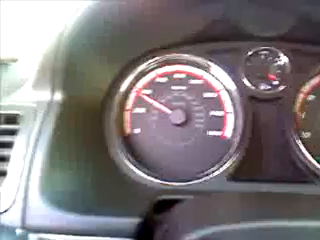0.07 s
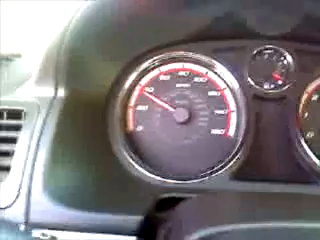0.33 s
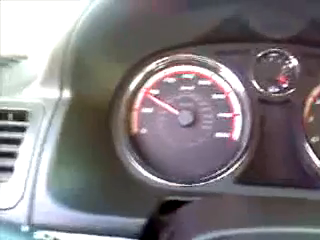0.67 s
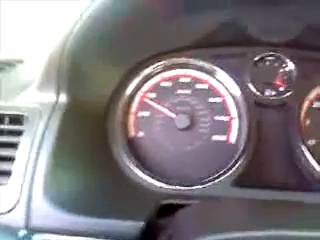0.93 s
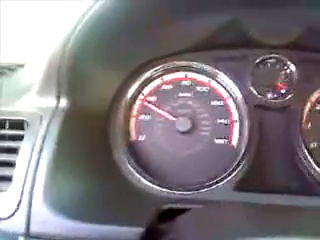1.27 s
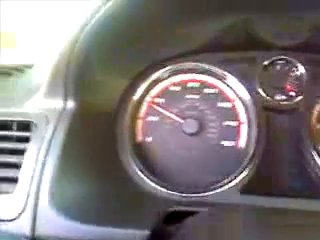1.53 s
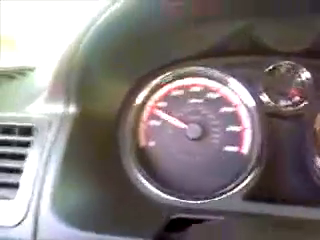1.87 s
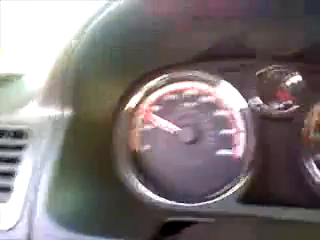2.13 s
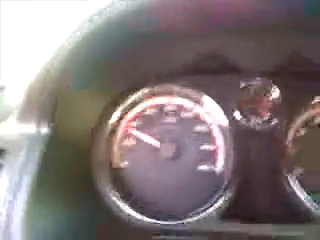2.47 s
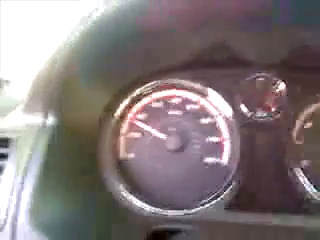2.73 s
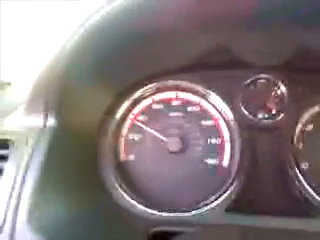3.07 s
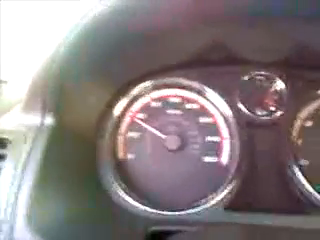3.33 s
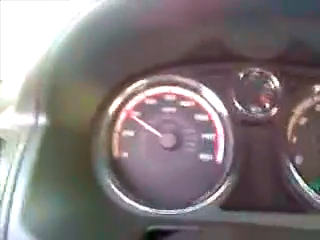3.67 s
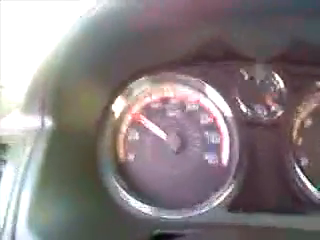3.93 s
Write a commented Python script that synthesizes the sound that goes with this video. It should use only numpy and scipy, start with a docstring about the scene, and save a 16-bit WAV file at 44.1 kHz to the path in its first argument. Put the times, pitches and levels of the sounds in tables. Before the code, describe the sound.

A car's supercharger whine climbs steadily over a growing engine roar after a short stretch of soft road noise. The dashboard trim ticks and rattles a few times, all sounding thin through a small microphone in the cabin.

```python
"""Inside a supercharged four-cylinder car, heard through a small microphone with almost no bass.
It opens abruptly on two seconds of cruising: tyre noise, a hiss that comes and goes, ticks of trim.
Then the throttle opens, the intake roars and the blower's whine climbs with the revs, its partials
swelling and fading as they sweep through the cabin's resonances. On the way up the engine booms
and small bumps rattle the trim."""
import sys
import numpy as np
from scipy import signal
from scipy.fft import rfft, irfft
from scipy.io import wavfile

SR = 44100
rng = np.random.default_rng(int(sys.argv[2]) if len(sys.argv) > 2 else 0)


def store_pcm(level_fs):
    """Save levels as 16-bit WAV."""
    pcm = np.round(np.clip(level_fs, -1, 1) * 32767).astype(np.int16)
    wavfile.write(sys.argv[1], SR, np.atleast_2d(pcm).T)


N = 176400
T = np.arange(N) / SR


def from_db(db):
    """Decibels to gain."""
    return 10 ** (np.asarray(db) / 20)


def rms_one(x):
    """Scale to unit rms."""
    return x / np.sqrt(np.mean(x ** 2) + 1e-20)


def in_time(rows):
    """An automation curve, read at every sample."""
    return np.interp(T, *np.transpose(rows))


def at_hz(points, hz):
    """An EQ curve in dB, read on a log-frequency axis."""
    known, db = np.transpose(points)
    return np.interp(np.log(np.maximum(hz, 1)), np.log(known), db)


def drift(rate_hz):
    """A smooth random modulator, rms about 1."""
    hop, settle = 40, 2000
    pole = np.exp(-2 * np.pi * hop * rate_hz / SR)
    white = rng.standard_normal(N // hop + settle + 2)
    slow = signal.lfilter([1], [1, -2 * pole, pole * pole], white)[settle:]
    return np.interp(np.arange(N) / hop, np.arange(len(slow)), rms_one(slow))


def resonate(x, hz, width_hz):
    """A resonance with gain 1 at its peak."""
    r = np.exp(-np.pi * width_hz / SR)
    feedback = [1, -2 * r * np.cos(2 * np.pi * hz / SR), r * r]
    return signal.lfilter(np.array([1, 0, -1]) * (1 - r * r) / 2, feedback, x)


def cabin_noise(spectrum, bands=14):
    """Coloured noise with fine peaks and dips from the cabin's dense modes; its bands flicker; rms 1."""
    ripple_db, ripple_width_hz, flicker_db = 1.95, 59, 1.0
    hz = np.arange(N // 2 + 1) * SR / N
    peaks = rng.standard_normal(1000)
    ripple = np.interp(hz / ripple_width_hz, np.arange(len(peaks)), peaks) * np.clip(hz / 2500, 0, 1)
    coloured = rfft(rng.standard_normal(N)) * from_db(at_hz(spectrum, hz) + ripple_db * ripple)
    band_of_bin = np.searchsorted(np.geomspace(400, 9000, bands - 1), hz)
    layers = (irfft(coloured * (band_of_bin == k), N) for k in range(bands))
    return rms_one(sum(layer * from_db(flicker_db * drift(rate_hz=23)) for layer in layers))


def partial(phase, depth, rate_hz):
    """A sine that starts anywhere in its cycle and wavers in level and phase; rms 1."""
    waver = 1 + depth * (drift(rate_hz) + 1j * drift(rate_hz))
    tone = np.exp(1j * (phase + 2 * np.pi * rng.random()))
    return rms_one((waver * tone).real)


def road():
    """The bed: steady tyre noise and a faint cabin hum under an airy hiss that comes and goes."""
    # colours of tyre noise and hiss (frequency [Hz], relative level [dB])
    tyre_colour = [(30, -75), (150, -84), (230, -33), (300, -29), (345, -48.5), (400, -17), (500, -17.5),
                   (610, 0.5), (800, -4), (930, 4), (1300, 4.5), (1520, -2), (1800, -1.5), (2450, -4),
                   (3150, -11), (3600, -13.5), (6000, -36.5), (11000, -31)]
    hiss_colour = [(150, -58), (500, -21), (2000, -16.5), (4000, 2.5), (5800, 0.5), (7000, 5), (9000, 3.5),
                   (11000, 0.5)]
    # swells of the hiss (time [s], level [dB])
    hiss_level = [(0, -56), (.25, -57), (.45, -64.5), (.6, -74.5), (1.1, -71), (1.3, -66.5), (1.44, -61.5),
                  (1.55, -65.5), (1.85, -70), (4, -60.5)]
    hum_hz = 314
    hum = from_db(-99) * partial(2 * np.pi * hum_hz * T, depth=0.27, rate_hz=11)
    tyres = from_db(-59) * cabin_noise(tyre_colour)
    hiss = from_db(in_time(hiss_level)) * cabin_noise(hiss_colour)
    return tyres + hiss + hum


def trim_rattle():
    """Each bump sets off a click or a short dying rattle of the trim, with one loose part ringing along."""
    # bumps (time [s], rattle level [dB], time to fall 20 dB [s], ring [Hz], ring over rattle [dB])
    bumps = [(0.6253, -56.5, 0.0075, 7200, 2), (0.634, -66, .06, 5960, -5), (0.704, -61.5, 0.012, 5150, 6),
             (0.706, -64, 0.014, 6600, 3), (1.604, -61, 0.035, 9500, -6), (2.759, -46.5, 0.078, 5230, -6),
             (2.791, -54.5, 0.022, 10000, 4.5), (3.403, -55, 0.1, 7200, 0)]
    # the trim's resonances (frequency [Hz], width [Hz], relative level [dB])
    trim_modes = [(3230, 410, 7), (5150, 530, 10.5), (6700, 7800, -4), (7200, 180, 8.5), (9230, 810, 1.5)]
    chatter = rng.standard_normal(N)
    rattle = rms_one(sum(from_db(db) * resonate(chatter, hz, width) for hz, width, db in trim_modes))
    out = 0
    for start, db, decay_s, ring_hz, ring_db in bumps:
        ring = from_db(ring_db) * rms_one(resonate(rng.standard_normal(N), ring_hz, width_hz=320))
        envelope = (T >= start) * from_db(db - 20 * np.maximum(T - start, 0) / decay_s)
        out += envelope * (rattle + ring)
    low_cut = signal.butter(2, 1800, "high", fs=SR, output="sos")  # the clicks and rattles carry no bass
    return signal.sosfilt(low_cut, out)


def engine(cycle_hz, cycle_phase):
    """Orders of the four-stroke cycle; every fourth is a firing order and stands out, and two boom."""
    # swell of the engine note (time [s], gain [dB])
    swell = [(0, -33), (1.6, -30), (1.9, -18.5), (2.07, -15.5), (2.5, -6), (3.2, -6), (4, 0.5)]
    # its colour in the cabin (frequency [Hz], gain [dB])
    colour = [(110, -55), (240, -38), (315, -28), (430, -26), (530, -11.5), (620, 2.5), (720, -10.5),
              (820, -6), (950, -2), (1100, -3), (1500, -7.5), (2500, -19)]
    # the two firing orders that boom in the cabin as the revs rise (time [s], level [dB])
    boom_20 = [(1.8, -100), (2.07, -70), (2.35, -67), (2.66, -68), (2.72, -53.5), (3.05, -61), (3.4, -52),
               (3.65, -63), (3.73, -45.5), (3.82, -73)]
    boom_24 = [(1.8, -89), (2.1, -61.5), (2.35, -58), (2.58, -49), (2.72, -59.5), (3.2, -72), (3.68, -60),
               (3.75, -64), (3.81, -66)]
    booms = {20: boom_20, 24: boom_24}
    firing_trim_db, between_trim_db = -55, -66.5
    out = 0
    for order in range(4, 49):
        phase = order * cycle_phase
        if order in booms:
            out += from_db(in_time(booms[order])) * partial(phase, depth=0.2, rate_hz=2.4)
        else:
            trim_db = firing_trim_db if order % 4 == 0 else between_trim_db
            db = in_time(swell) + trim_db + at_hz(colour, order * cycle_hz)
            out += from_db(db) * partial(phase, depth=0.4, rate_hz=6.6)
    return out


def intake(cycle_phase, load_db):
    """Rushing air that grows with the load and throbs with each cylinder's stroke."""
    # colour of the roar (frequency [Hz], relative level [dB])
    roar_colour = [(30, -54), (180, -75), (340, -44), (420, -14), (510, -7), (610, 0), (740, 9), (860, 0.5),
                   (960, 4.5), (1120, -9.5), (1320, 7), (1500, -1), (1750, 4.5), (2100, 0.5), (3050, 2),
                   (3600, -5), (4700, -2.5), (7000, -6.5), (9000, -9.5), (11000, -18.5)]
    throb = 1 + 0.034 * np.cos(4 * cycle_phase)
    return from_db(-43.5 + load_db) * throb * cabin_noise(roar_colour)


def supercharger(lobe_phase, load_db):
    """The whine, harmonics of the lobe rate: three lead, weaker ones drift in and out and flare."""
    # the leading harmonics, 2, 4 and 6 (time [s], level [dB])
    second = [(2.0, -82), (2.601, -54.5), (2.82, -41), (2.96, -44.5), (3.04, -53.5), (3.18, -61),
              (3.378, -46), (3.44, -58.5), (3.618, -66), (3.628, -51.5), (3.7, -43.5), (3.785, -37.5),
              (3.93, -44.5), (4, -46)]
    fourth = [(2.0, -71), (2.12, -74), (2.22, -53), (2.28, -54.5), (2.33, -48.5), (2.43, -48),
              (2.56, -54.5), (2.69, -51.5), (2.74, -59.5), (2.84, -59.5), (2.9, -51), (2.98, -49.5),
              (3.08, -56.5), (3.14, -44.5), (3.2, -41.5), (3.33, -42), (3.39, -49.5), (3.42, -46.5),
              (3.46, -49.5), (3.55, -50), (3.64, -39.5), (3.72, -42.5), (3.76, -58), (3.8, -43),
              (3.87, -48.5), (3.9, -47.5), (3.95, -43), (4, -49)]
    sixth = [(2.0, -72), (2.14, -70), (2.2, -60.5), (2.29, -67), (2.34, -60), (2.42, -50.5), (2.48, -77),
             (2.66, -82), (2.72, -52), (2.8, -43.5), (2.85, -52), (2.9, -45), (2.96, -49), (3.0, -66),
             (3.044, -39.5), (3.22, -42.5), (3.37, -54), (3.44, -43.5), (3.5, -41), (3.58, -44),
             (3.63, -57), (3.7, -63), (3.76, -52), (3.98, -60)]
    # the weaker harmonics (harmonic, level at 0 dB load [dB])
    overtones = [(3, -62.5), (5, -58), (7, -61.5), (8, -62.5), (9, -69.5), (10, -60), (11, -64),
                 (12, -62.5), (13, -66), (14, -66), (16, -68)]
    # fluttering flares as a harmonic crosses a cabin resonance (start [s], end [s], harmonic, level [dB])
    flares = [(2.093, 2.152, 8, -60.5), (2.157, 2.323, 10, -61), (2.205, 2.3, 5, -56),
              (2.214, 2.295, 8, -55), (2.277, 2.35, 7, -54), (2.3, 2.45, 5, -58.5), (2.36, 2.69, 8, -57),
              (2.473, 2.614, 3, -54), (2.7, 2.765, 11, -55), (2.76, 2.997, 8, -59.5),
              (2.774, 2.897, 12, -59), (2.845, 2.93, 10, -54), (2.88, 2.953, 13, -57),
              (3.03, 3.095, 7, -50), (3.03, 3.155, 12, -53.5), (3.15, 3.3, 10, -58.5),
              (3.153, 3.298, 11, -49.5), (3.24, 3.31, 8, -54.5), (3.374, 3.455, 7, -49.5),
              (3.364, 3.454, 11, -54), (3.444, 3.552, 8, -57), (3.457, 3.61, 12, -57),
              (3.447, 3.673, 10, -55), (3.507, 3.976, 3, -54.5), (3.605, 3.767, 5, -57),
              (3.663, 3.825, 8, -54), (3.664, 3.78, 9, -54.5), (3.763, 4.05, 11, -58), (3.79, 3.92, 9, -49),
              (3.818, 3.98, 7, -55), (3.863, 4.05, 5, -52), (3.856, 4.05, 10, -56)]
    whine_in_s, whine_fade_s, flare_edge_s = 1.89, 0.11, 0.045
    bypass_shuts_s, bypass_takes_s, load_share = 2, 0.17, 0.59
    whine = 0
    for harmonic, level in (2, second), (4, fourth), (6, sixth):
        whine += from_db(in_time(level)) * partial(harmonic * lobe_phase, depth=0.12, rate_hz=28)
    whine *= np.clip((T - whine_in_s) / whine_fade_s, 0, 1)
    # the weaker harmonics set in as the bypass shuts, then follow part of the load's swing
    boost = np.clip((T - bypass_shuts_s) / bypass_takes_s, 0, 1) * from_db(load_share * load_db)
    for harmonic, db in overtones:
        whine += boost * from_db(db) * partial(harmonic * lobe_phase, depth=1, rate_hz=14.6)
    for start, end, harmonic, db in flares:
        swell = np.clip(np.minimum(T - start, end - T) / flare_edge_s + 0.5, 0, 1)
        whine += from_db(db) * swell * partial(harmonic * lobe_phase, depth=0.35, rate_hz=41)
    return whine


def scene():
    """One shaft speed drives blower, engine and intake, over the road bed and the rattling trim."""
    # the revs, as the pitch of the blower's lobes (time [s], lobe rate [Hz])
    revs = [(0, 300.0), (1.8, 308.0), (2.0, 318.0), (2.1, 327.8), (2.42, 351.5), (2.52, 363.9),
            (2.6, 366.6), (2.7, 380.9), (2.98, 401.8), (3.12, 419.7), (3.24, 427.2), (3.4, 446.3),
            (3.44, 454.1), (3.58, 461.7), (3.76, 478.9), (3.9, 496.1), (4.0, 507.0)]
    # engine load (time [s], gain [dB])
    load = [(0, -16.5), (1.5, -20), (1.95, -16.5), (2.12, -13.5), (2.25, -8.5), (2.5, -6), (2.95, -4.5),
            (3.2, -3), (3.6, -2.6), (4, 0.5)]
    lobes_per_cycle, speed_jitter = 12.42, 0.0007
    load_db = in_time(load)
    lobe_hz = in_time(revs) * (1 + speed_jitter * drift(rate_hz=37))
    lobe_phase = 2 * np.pi * np.cumsum(lobe_hz) / SR
    cycle_hz, cycle_phase = lobe_hz / lobes_per_cycle, lobe_phase / lobes_per_cycle
    car = supercharger(lobe_phase, load_db) + engine(cycle_hz, cycle_phase) + intake(cycle_phase, load_db)
    return (car + road() + trim_rattle())[None]


def record(dry):
    """The sound opens abruptly after a faint lead-in, and the top is cut steeply."""
    open_s, lead_in_s, cutoff_hz = 0.079, 0.044, 10900
    lead_in = from_db(-14) * np.clip((T - open_s) / lead_in_s + 1, 0, 1)
    opened = dry * np.where(T < open_s, lead_in, 1)
    high_cut = signal.ellip(12, 0.2, 80, cutoff_hz, fs=SR, output="sos")
    return signal.sosfilt(high_cut, opened)


dry = scene()
out = record(dry)
store_pcm(out)
```